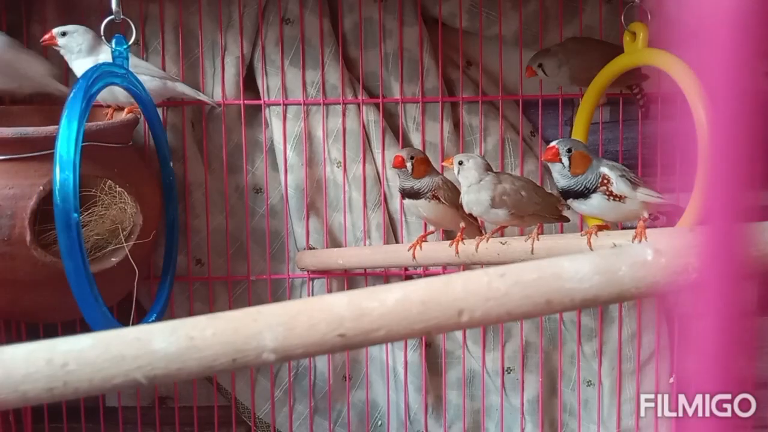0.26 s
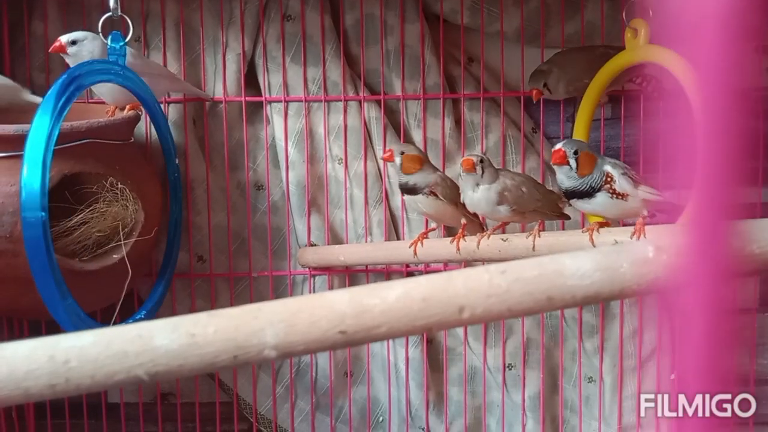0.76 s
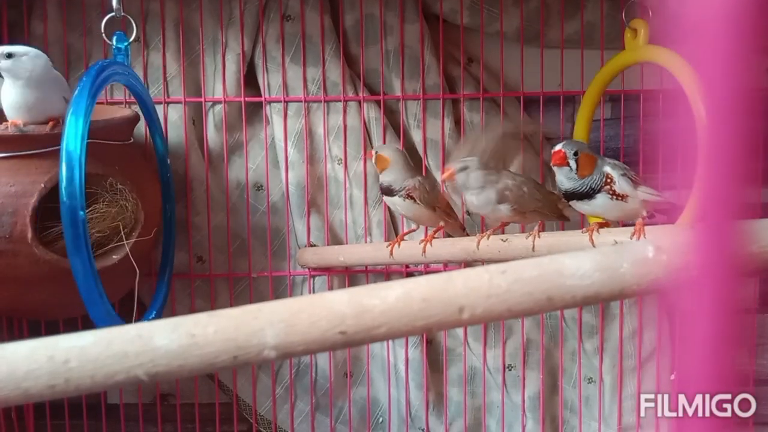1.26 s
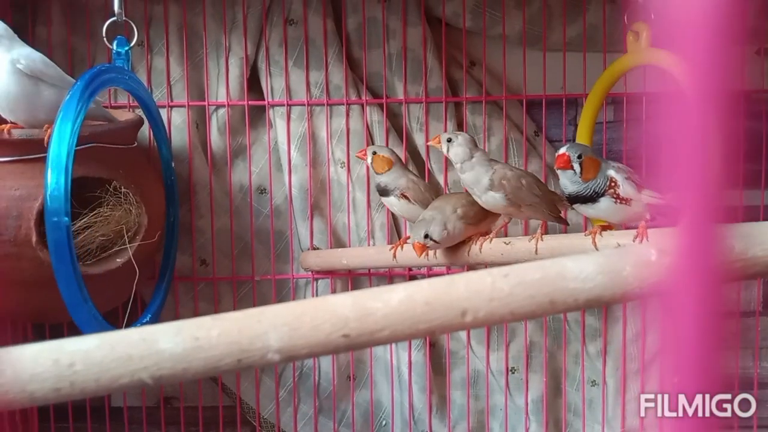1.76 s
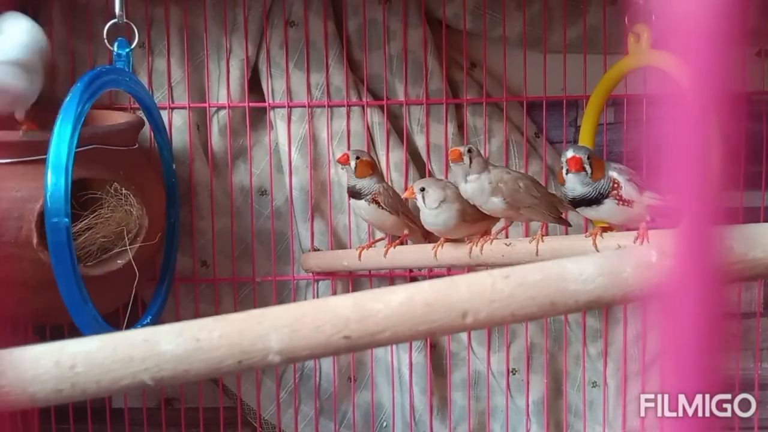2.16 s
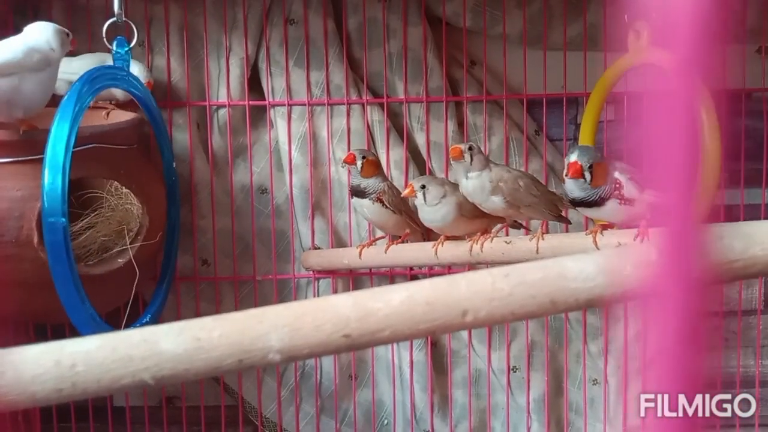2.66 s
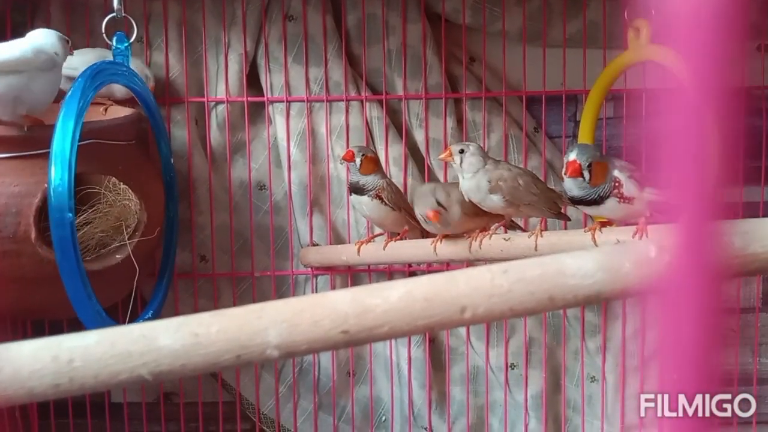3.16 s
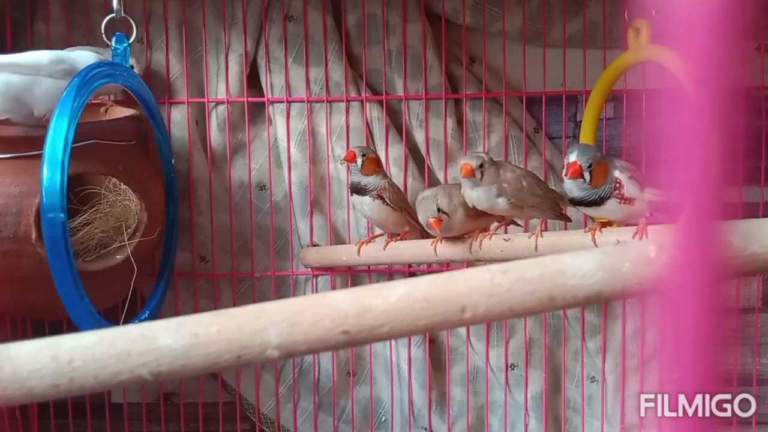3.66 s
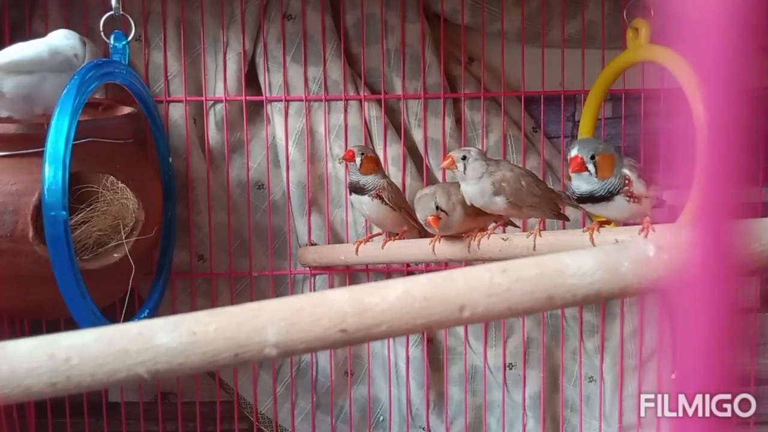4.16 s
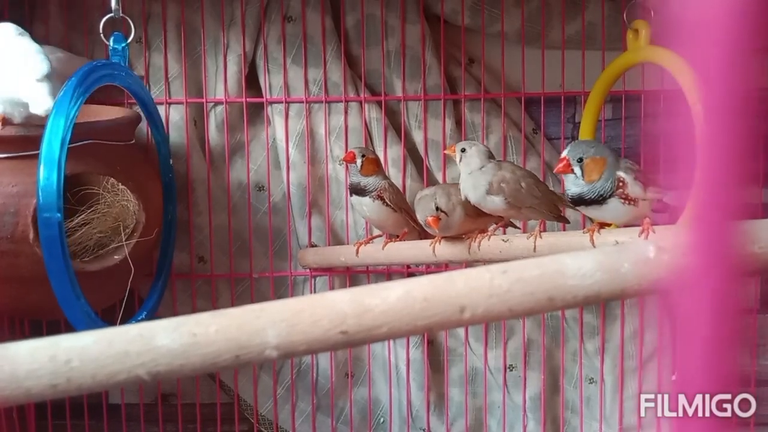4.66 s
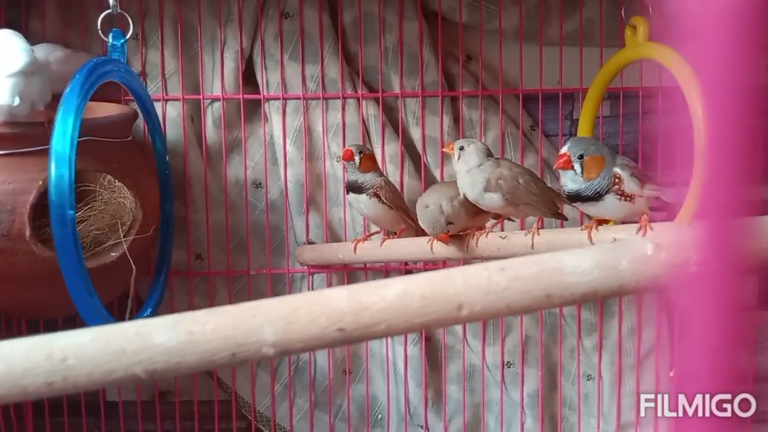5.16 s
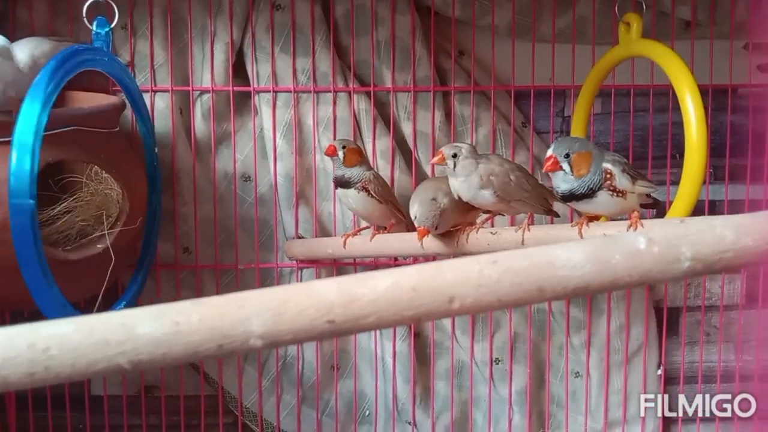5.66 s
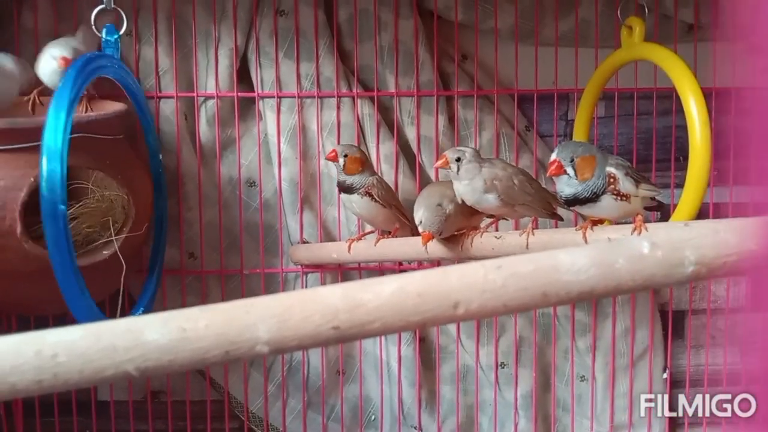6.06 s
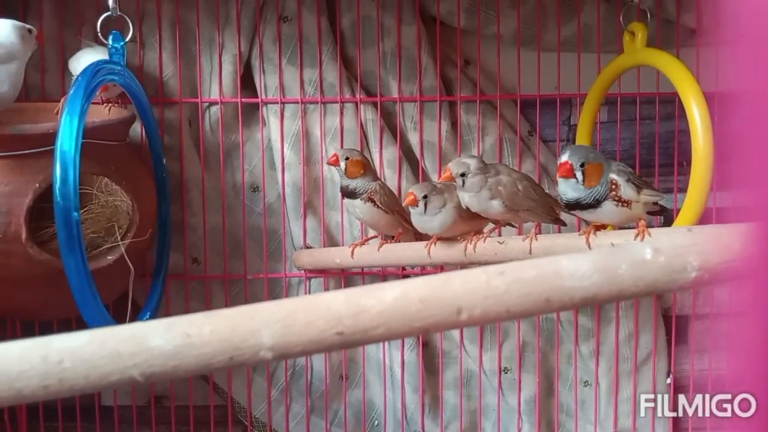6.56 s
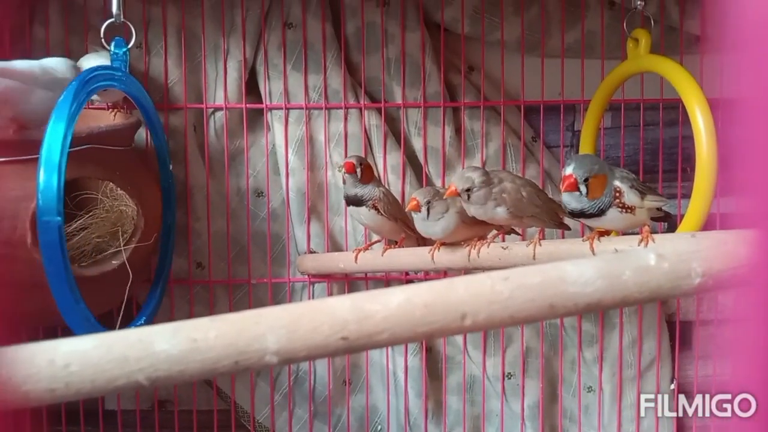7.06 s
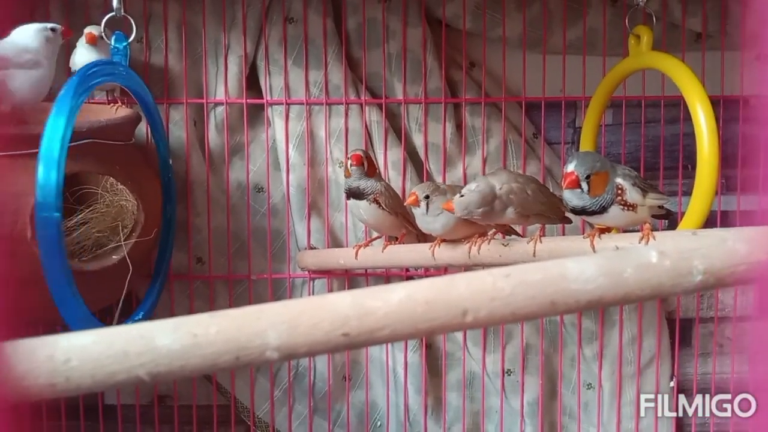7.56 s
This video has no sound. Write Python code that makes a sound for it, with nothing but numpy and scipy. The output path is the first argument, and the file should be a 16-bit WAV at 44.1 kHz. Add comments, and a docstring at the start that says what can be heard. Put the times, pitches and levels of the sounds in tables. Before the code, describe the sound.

Feathers flutter briefly as a finch's rapid, raspy song is already under way. It returns about nine times, some rounds cut off early, with little ticks and nasal peeps from neighbours between and over it. Dull wind thumps bump the phone microphone early and more strongly late. Behind lie very quiet air, a faint drone and thin whine; a distant blurred coo rises near the end on the small, hard-walled balcony.

```python
"""Zebra finches in a cage on a balcony, over still air (shaped noise), a low drone, a whine (a sine) and faint
hiss. From the start one male repeats a motif of sweeps, chips and buzzes, breaking off early or late, as
feathers rustle. A far bird whistles, the others call (at 6.1 s the male adds a lone cry) and puffs of air (low
noise) rumble on the microphone; near the end a pigeon coos. Each voice is a gliding harmonic stack of the
syrinx, coloured by throat and beak and answered by the close walls."""
import sys
import numpy as np
from scipy import signal
from scipy.fft import rfft, irfft, next_fast_len
from scipy.io import wavfile
from scipy.ndimage import map_coordinates

SR = 44100
rng = np.random.default_rng(int(sys.argv[2]) if len(sys.argv) > 2 else 0)


def file_out(sig):
    """Save sig as 16-bit WAV at sys.argv[1]."""
    # one column per channel
    cols = np.atleast_2d(sig).T
    # limit, then scale
    lim = np.clip(cols, -1, 1)
    pcm = np.round(lim * 32767).astype(np.int16)
    wavfile.write(sys.argv[1], SR, pcm)


N = 344950
TOP_HZ = 15650  # upper band limit

# Resonances of the pigeon's crop, lent to the far bird too: frequency_hz, gain_db
PIGEON_CROP = [(150, 7.5), (420, 1.5), (650, 0), (850, 3.5), (1170, 8), (1350, 2), (1700, -29), (3000, -50)]


def amp(db):
    """Level: decibels to an amplitude ratio."""
    return 10 ** (np.asarray(db) / 20)


def unit(x):
    """Normalisation: scale to an rms of 1."""
    return x / np.sqrt(np.mean(x ** 2) + 1e-20)


def colour(points, hz):
    """Frequency response: the gain of (hz, db) points joined on a logarithmic frequency axis."""
    f, db = np.transpose(points)
    return amp(np.interp(np.log(hz + 1), np.log(f + 1), db))


def wobble(rate, size):
    """Slow random modulation: a smooth curve through random knots, rate of them a second."""
    knots = rng.standard_normal(int(size * rate / SR) + 4)
    return map_coordinates(knots, [np.arange(size) * rate / SR])


def filtered(x, response):
    """Linear filtering: multiply the spectrum by a response given as a function of frequency."""
    m = next_fast_len(N + SR // 2)
    return irfft(rfft(x, m) * response(np.fft.rfftfreq(m, 1 / SR)), m)[:N]


def noise(spectrum):
    """Shaped noise: white noise coloured by a spectrum, at an rms of 1."""
    return unit(filtered(rng.standard_normal(N), lambda hz: colour(spectrum, hz)))


def add(track, s, sound):
    """Superposition: mix a sound into the track at s seconds, or at its beginning if s is negative."""
    part = track[max(round(s * SR), 0):][:len(sound)]
    part += sound[:len(part)]


def level_curve(rows):
    """Envelope: (s, db) points joined by straight lines over the whole scene."""
    return np.interp(np.arange(N) / SR, *np.transpose(rows))


def still_air():
    """Ambient noise: a broad random spectrum whose level wavers slowly."""
    # Spectrum of the still air: frequency_hz, gain_db
    air_spectrum = [(25, -21), (90, -5), (200, 5.5), (600, 0.5), (1000, -7), (1350, 6.5), (2000, -12.5),
                    (3000, -2.5), (4300, -13), (5500, -12), (7000, -2), (8300, 0), (10300, -4.5),
                    (11300, -43), (15500, -18)]
    return amp(-71 + 2.5 * wobble(3.6, N)) * noise(air_spectrum)


def low_drone():
    """Narrow low-frequency noise: a drone of uneven level."""
    # Spectrum of the drone: frequency_hz, gain_db
    drone_spectrum = [(25, -30.5), (45, -16), (65, 5.5), (85, 0.5), (130, -12.5), (300, -24), (900, -31),
                      (3000, -84.5)]
    # Course of its level: time_s, level_db
    drone_level = [(0, -61), (.7, -60.5), (2, -65.5), (3, -60), (3.7, -78.5), (4.6, -70.5), (5.1, -72.5),
                   (7.82, -71)]
    return amp(level_curve(drone_level) + 6.3 * wobble(12, N)) * noise(drone_spectrum)


def whine():
    """Pure tone: one sine whose frequency wavers slightly and whose level comes and goes."""
    # Course of the whine's level: time_s, level_db
    whine_level = [(0, -64), (1.1, -64.5), (1.5, -71), (6.7, -92), (7.2, -57.5), (7.82, -62)]
    hz = 5520 + 8 * wobble(60, N)
    phase = 2 * np.pi * np.cumsum(hz) / SR
    return amp(level_curve(whine_level) + 1.5 * wobble(9.4, N)) * np.sin(phase)


def hiss(rest_db=-81, waver_db=2):
    """Amplitude-modulated noise: a faint high hiss swells and fades in smooth arches."""
    # Spectrum of the hiss: frequency_hz, gain_db
    hiss_spectrum = [(5000, -9), (8500, -2.5), (11500, -5), (15500, -0.5)]
    # Swells of the hiss: top_s, length_s, level_db
    swells = [(.38, 0.78, -51.5), (0.837, 0.25, -52), (1.226, 0.11, -56), (1.5, 0.49, -56.5),
              (1.99, 0.37, -59), (2.748, .1, -56.5), (2.92, 0.12, -53.5), (3.443, 0.079, -63),
              (3.842, 0.16, -62.5), (4.697, 0.19, -56), (4.909, .1, -57), (5.097, 0.071, -72),
              (5.282, .13, -53.5), (6.19, 0.6, -59), (6.85, 0.11, -53.5), (7.015, 0.094, -54),
              (7.274, 0.18, -59), (7.638, 0.18, -59)]
    strength = np.full(N, amp(rest_db))
    for top, length, db in swells:
        add(strength, top - length / 2, amp(db) * np.hanning(int(length * SR)))
    return strength * amp(waver_db * wobble(6.1, N)) * noise(hiss_spectrum)


def turbulence(beak, size):
    """Turbulent flow: a short rush of air through the beak, rms 1."""
    spectrum = rfft(rng.standard_normal(size))
    return unit(irfft(spectrum * colour(beak, np.fft.rfftfreq(size, 1 / SR)), size))


def syrinx(gesture, beak, flutter=0, flutter_hz=0, tilt_db=0, jitter=0.018, shimmer=0.64, jitter_hz=1400,
           uneven_db=4.0, uneven_hz=70, rasp=0.43):
    """Source and filter: a gliding harmonic stack slides through the resonances of the beak.

    Columns of gesture: time_s, pitch_hz, level_db, count of strong harmonics, roughness (0-1)."""
    s, pitch, db, harmonics, rough = np.transpose(gesture)
    t = np.arange(int(s[-1] * SR)) / SR
    follow = lambda column: np.interp(t, s, column)
    rough = follow(rough)
    vibrato = flutter * np.sin(2 * np.pi * flutter_hz * t)
    hz = follow(pitch) * (1 + jitter * rough * wobble(jitter_hz, len(t)) + vibrato)
    k = np.arange(1, min(24, int(TOP_HZ / pitch.min())) + 1)[:, None]

    gains = colour(beak, k * hz) * amp(tilt_db * np.log2(k))  # tilt in dB per octave
    # harmonics beyond the strong ones fall away steeply; few of them leave a nearly pure tone
    gains /= 1 + (k / np.maximum(follow(harmonics), .5)) ** 9
    gains *= k * hz < SR / 2
    # the moving beak favours now one harmonic, now another
    gains *= amp(uneven_db * np.array([wobble(uneven_hz, len(t)) for _ in k]))
    gains /= np.sqrt(np.sum(gains ** 2, axis=0) / 2 + 1e-20)

    # the throat delays each harmonic differently, which blunts the pulses
    phase = 2 * np.pi * (k * np.cumsum(hz) / SR + rng.random(k.shape))
    voice = np.sum(gains * np.sin(phase), axis=0) + rasp * rough * turbulence(beak, len(t))
    fade = np.clip(np.minimum(t - s[0], s[-1] - t) / .002, 0, 1)  # 2 ms at either end
    return voice * amp(follow(db)) * (1 + shimmer * rough * wobble(jitter_hz, len(t))) * fade


def balcony(sound, near_db=-13, near_t60=0.26, far_db=-22, far_t60=0.18, wall_db=-6, wall_delay=0.019):
    """Room response: direct sound, four wall echoes and two diffuse tails, drawn anew for every sound."""
    t = np.arange(SR // 3) / SR

    def tail(t60):
        """Reverberant decay: noise that falls by 60 dB in t60 seconds."""
        return unit(rng.standard_normal(len(t)) * amp(-60 * t / t60) * (t > .002)) / np.sqrt(len(t))

    response = (t == 0) + amp(near_db) * tail(near_t60) + amp(far_db) * tail(far_t60)
    walls = (rng.uniform(0.11, 1, size=4) * wall_delay * SR).astype(int)
    response[walls] += amp(wall_db) / 2  # the four echoes share the power of wall_db
    return signal.fftconvolve(sound, response / np.linalg.norm(response))


def note(start, length, hz, end_hz, db, harmonics, rough, held=0, bend=1, scoop=0, droop_db=0,
         attack=0.0052, release=0.0013, size=96):
    """Frequency glide: the pitch scoops up, holds for a share of the length, then glides (early if bend < 1)."""
    gate_db = 16  # the note starts and ends this far below its body
    t = np.linspace(0, length, size)
    opening = np.clip(t / attack, 0, 1)
    closing = np.clip((length - t) / release, 0, 1)
    glide = np.clip((t / length - held) / (1 - held), 0, 1) ** bend
    pitch = hz * (end_hz / hz) ** glide * (1 - scoop * (1 - opening))
    level = db + droop_db * t / length - gate_db * ((1 - opening) ** 2 + (1 - closing) ** 2)
    return np.transpose([start + t, pitch, level, np.full(size, harmonics), np.full(size, rough)])


def syllable(name, stray=0.00657):
    """Frequency modulation of a voice: a few notes share one small stray in pitch; only the buzz flutters."""
    # Notes of each syllable, as arguments of note(): start, length, attack, release [s]; hz, end_hz [Hz];
    # db, droop_db [dB]; harmonics [count of strong ones]; rough, held, scoop [0-1]; bend [exponent]
    squeak_notes = [dict(start=0, length=0.011, hz=5320, end_hz=5650, db=-5.5, harmonics=1.2, rough=0.24),
                    dict(start=0.0079, length=0.01153, hz=4300, end_hz=2680, bend=0.57, db=4, droop_db=-9.5, attack=0.0025, release=0.0035, harmonics=0.9, rough=0.23)]
    hook_notes = [dict(start=0, length=0.036, hz=2886, end_hz=1790, bend=1.2, db=-1.5, droop_db=-3.5, harmonics=1.95, rough=0.18),
                  dict(start=.032, length=0.073, hz=868, end_hz=485, bend=1.4, db=2.5, droop_db=2, attack=0.024, release=0.041, harmonics=10.1, rough=0.18)]
    cry_notes = [dict(start=0, length=0.094, hz=891, end_hz=520, held=.36, bend=0.88, scoop=.25, db=-1, droop_db=-1.5, attack=0.0097, release=0.027, harmonics=20.2, rough=0.16)]
    chip_notes = [dict(start=0.0014, length=0.0262, hz=1945, end_hz=1458, db=-20, harmonics=1.5, rough=0.94),
                  dict(start=.022, length=0.0144, hz=5310, end_hz=7420, db=-11, droop_db=10, harmonics=1.2, rough=0.54)]
    stutter_notes = [dict(start=0.00074, length=0.0066, hz=896, end_hz=675, db=-18, attack=0.00092, release=.003, harmonics=11, rough=.95),
                     dict(start=.019, length=0.0087, hz=897, end_hz=705, db=-9.5, attack=0.00081, release=0.0045, harmonics=11, rough=0.71),
                     dict(start=0.036, length=0.004, hz=925, end_hz=673, db=-6.5, attack=0.0008, release=0.0022, harmonics=9.7, rough=0.66),
                     dict(start=.036, length=0.019, hz=2033, end_hz=1665, bend=0.62, db=0.5, droop_db=-5.5, release=0.0077, harmonics=3.5, rough=0.39)]
    buzz_notes = [dict(start=0.0024, length=0.051, hz=3040, end_hz=2878, db=-4.5, attack=0.027, release=0.021, harmonics=1, rough=0.16)]
    tut_notes = [dict(start=.002, length=.031, hz=734, end_hz=575, db=-5.5, attack=0.012, release=0.016, harmonics=12.9, rough=0.65)]
    slur_notes = [dict(start=0, length=0.019, hz=1441, end_hz=1372, db=-12, harmonics=4.06, rough=0.14),
                  dict(start=.015, length=.028, hz=1403, end_hz=945.6, db=0, droop_db=-4, attack=0.0044, release=0.002, harmonics=7.6, rough=0.36),
                  dict(start=.038, length=.086, hz=995, end_hz=539, bend=.9, db=-5, droop_db=-12, attack=0.0046, release=0.029, harmonics=14.8, rough=0.4)]
    # Resonances of throat and beak: frequency_hz, gain_db
    hook_beak = [(600, -40.5), (1100, -24.5), (1600, -8), (2400, -13.5), (3200, -3), (4000, -2.5),
                 (5100, -1.5), (6700, -2), (7500, -1.5), (8400, -19), (10000, -8), (15000, -16)]
    cry_beak = [(600, -45), (1100, -28), (1700, -10), (2200, -22.5), (2800, -9.5), (3500, -1), (4300, -6.5),
                (5300, -1), (6200, -12), (7000, -24), (9500, -39.5), (15000, -34)]
    chip_beak = [(1000, -22.5), (1800, -3.5), (2500, -5), (3700, 10.5), (5200, -6.5), (7000, -4.5),
                 (9000, -12.5), (15000, -45)]
    tut_beak = [(600, -50), (1500, -25), (2500, -11), (3400, 1.5), (4500, -8), (5500, -11.5), (7200, -0.5),
                (9000, -12), (15000, -20)]
    slur_beak = [(600, -10.5), (1000, -31.5), (1450, 6), (2000, -3), (2900, 4), (3900, 7), (4700, 0.5),
                 (5600, 4), (6900, -0.5), (8000, -11.5), (9500, -22.5), (15000, -19.5)]
    notes, beak = {
        "squeak": (squeak_notes, hook_beak), "hook": (hook_notes, hook_beak),
        "cry": (cry_notes, cry_beak), "chip": (chip_notes, chip_beak),
        "stutter": (stutter_notes, chip_beak), "buzz": (buzz_notes, chip_beak),
        "tut": (tut_notes, tut_beak), "slur": (slur_notes, slur_beak)}[name]
    flutter = .12 * (name == "buzz")  # share of the pitch
    tuning = [1, 1 + stray * rng.standard_normal(), 1, 1, 1]  # scales the pitch column alone
    sound = np.zeros(SR // 6)
    for shape in notes:
        add(sound, 0, syrinx(note(**shape) * tuning, beak, flutter=flutter, flutter_hz=214.4))
    return balcony(sound)


def song():
    """Temporal pattern: the male runs through his motif until he breaks off, with single syllables besides."""
    # The motif, always in this order: delay_s, level_db, syllable name
    motif = [(0, 0, "stutter"), (.066, -2.5, "buzz"), (.154, -0.5, "slur"), (.308, -9.5, "squeak"),
             (.327, -5.5, "hook"), (.468, 4, "cry"), (.629, -4.5, "chip")]
    # Names of the syllables that take the level of the opening
    opening_names = ("stutter", "buzz")
    # Each time he sings it: start_s, opening_db, rest_db, name of the last syllable
    songs = [(-.287, -33, -30.5, "chip"), (.432, -29, -28, "hook"), (1.624, -28.5, -27, "hook"),
             (2.53, -33, -28.5, "chip"), (3.251, -32.5, -30, "squeak"), (4.187, -35.5, -29, "chip"),
             (4.906, -35.5, -29, "chip"), (5.627, -40, -32, "hook"), (6.609, -29, -27.5, "hook")]
    # Single syllables besides: start_s, level_db, syllable name
    asides = [(.868, -41, "tut"), (1.216, -42, "tut"), (1.358, -33, "chip"), (1.447, -27, "stutter"),
              (1.553, -30.5, "tut"), (2.356, -38.5, "stutter"), (2.459, -40.5, "tut"),
              (4.011, -40.5, "stutter"), (4.113, -41, "tut"), (6.428, -31.5, "stutter"),
              (6.53, -38.5, "tut")]
    track = np.zeros(N)
    for start, opening_db, rest_db, last in songs:
        for delay, db, name in motif:
            if start + delay >= 0:  # the first song is already under way
                song_db = opening_db if name in opening_names else rest_db
                add(track, start + delay, amp(db + song_db) * syllable(name))
            if name == last:
                break
    for start, db, name in asides:
        add(track, start, amp(db) * syllable(name))
    return track


def rustle(depth_db=10, flutter_db=4.5, grain_db=2.0):
    """Friction noise: each shake of the feathers swells and dies away, fluttering and grainy."""
    # Spectrum of the feathers: frequency_hz, gain_db
    feather_spectrum = [(500, -16), (1400, -1), (3000, 5.5), (6000, 10), (8000, 1.5), (11000, -14),
                        (15500, -8.5)]
    # Bursts of rustling: start_s, length_s, level_db
    bursts = [(0.054, 0.56, -40), (.6, 0.42, -61.5), (1.43, 0.25, -55), (6.536, 0.22, -52)]
    strength = np.zeros(N)
    for start, length, db in bursts:
        arch = np.sin(np.linspace(0, np.pi, int(length * SR)))
        add(strength, start, amp(db + depth_db * (arch - 1.0)) * arch)
    grain = amp(flutter_db * wobble(46, N) + grain_db * wobble(700, N))
    return strength * grain * noise(feather_spectrum)


def far_bird():
    """Nearly sinusoidal tone: thin whistles glide up, their level arched, blurred by the buildings."""
    # Whistles: start_s, length_s, pitch_hz (at mid-length), level_db
    whistles = [(0.27, 0.044, 1317, -36.5), (1.157, 0.073, 1307, -54), (3.67, 0.042, 1345, -72),
                (7.172, 0.079, 1280, -48.5)]
    track = np.zeros(N)
    for start, length, hz, db in whistles:
        gesture = [(0, .93 * hz, -12, 1, .2), (length / 2, hz, 0, 1, .2), (length, 1.1 * hz, -12, 1, .2)]
        add(track, start, amp(db) * balcony(syrinx(gesture, PIGEON_CROP), far_db=1))
    return track


def flock(rise=0.01543, fall=0.014, clean=0.16, rough=0.46, harmonics=15):
    """Harmonic call: a contact call scoops up to a held clean pitch, then sags and roughens."""
    # Contact calls, and at 6.098 s the male's lone cry: start_s, length_s, pitch_hz, held_share (0-1), end_hz,
    # # level_db, swell_db, bright_db (per octave)
    calls = [(0.859, 0.045, 645, 0.61, 493, -39.5, 3, 1.5), (0.937, 0.075, 822, 0.29, 536, -32, 1.5, 4),
             (1.571, 0.1, 669, 0.18, 530, -44.5, 3, 6.5), (2.016, 0.07, 785, 0.19, 515, -33.5, -1, 2),
             (2.143, 0.072, 579.6, 0.47, 567.5, -42, 5.5, 4.5), (2.201, 0.09, 659, 0, 650, -51, -14, 9),
             (2.307, 0.098, 794, 0.19, 509.6, -38, 4, 5), (2.611, 0.075, 692, 0.55, 636, -45.5, 6, 4),
             (2.826, 0.086, 480, 0.45, 450, -35, 5, 4), (3.218, 0.1, 668.4, 0.7, 622, -49.5, 7, 1.5),
             (3.676, 0.047, 544, 1, 541, -60.5, 3, 14), (5.458, 0.093, 780, 0.2, 513, -39.5, -2, 0),
             (6.098, 0.11, 895, 0.26, 503, -33.5, -6.5, 6.5), (6.262, 0.06, 695, 0, 561, -42, 2, 9.5),
             (6.344, 0.085, 485, 0.5, 463, -35.5, 5, 5.5), (7.039, 0.098, 863.4, 0.55, 582, -31, 6, 4.5),
             (7.226, 0.075, 575, 0.49, 550, -40.5, 2.5, 4), (7.396, 0.097, 825, 0.16, 502.5, -35, -3, 1),
             (7.786, 0.068, 580, .6, 550, -55, 19, 0)]
    # Resonances of throat and beak: frequency_hz, gain_db
    flock_beak = [(500, -22), (1100, -8.5), (1700, -2.5), (2200, -7), (2800, -1), (3400, 6.5), (4000, -7.5),
                  (4700, 2), (5400, -9), (6500, -21.5), (9000, -32.5), (15000, -58)]
    track = np.zeros(N)
    for start, length, hz, held, end_hz, db, swell_db, bright_db in calls:
        times = np.sort([0, rise, held * length, length - fall, length])
        pitch = np.interp(times, [0, rise, held * length, length], [0.84 * hz, .985 * hz, hz, end_hz])
        level = np.interp(times, [0, rise, length - fall, length], [-19, -swell_db / 2, swell_db / 2, -17])
        roughness = clean + rough * (1 - held) * (times > held * length)
        gesture = np.transpose([times, pitch, level, np.full_like(times, harmonics), roughness])
        call = syrinx(gesture, flock_beak, tilt_db=bright_db, uneven_hz=42.6)
        add(track, start, amp(db) * balcony(call))
    return track


def puffs(rise_s=0.014):
    """Wind noise: moving air buffets the microphone port; each puff rises fast and ebbs away."""
    # Spectrum of the rumble: frequency_hz, gain_db
    rumble_spectrum = [(15, -64), (25, -35), (71, 2), (130, 4.5), (167, -3), (237, -14.5), (362, -34.5),
                       (460, -33), (600, -66), (780, -73), (1320, -120)]
    # Puffs of air: peak_s, level_db, ebb_s (time constant)
    gusts = [(1.04, -53.5, .02), (1.11, -63, 0.011), (1.325, -44, 0.036), (1.471, -37, 0.072),
             (1.555, -32, 0.038), (1.669, -27.5, 0.037), (1.865, -46, 0.028), (2.88, -44, 0.014),
             (5.57, -46.5, 0.015), (5.735, -36, 0.029), (5.99, -51.5, 0.046), (6.14, -52, 0.041),
             (6.254, -27, 0.046), (6.33, -40, 0.18), (6.593, -29, 0.047), (6.68, -37, 0.2),
             (6.86, -35, 0.046), (6.953, -41, 0.022), (7.1, -45.5, 0.076)]
    t = np.arange(N) / SR
    power = np.zeros(N)
    for peak, db, ebb in gusts:
        envelope = np.exp(-np.maximum((peak - t) / rise_s, (t - peak) / ebb))
        power += (amp(db) * envelope) ** 2
    return np.sqrt(power) * noise(rumble_spectrum)


def pigeon():
    """Low resonant voice: a coo of few harmonics rises, then sinks a little, blurred by the buildings."""
    # The coo's gesture: time_s, pitch_hz, level_db, count of strong harmonics, roughness (0-1)
    coo_gesture = [(7.05, 148.4, -63, 1.3, 0.7), (7.119, 222.7, -49, 1.3, .5), (7.279, 335.5, -51, 2, 0.76),
                   (7.391, 386.7, -45, 3, 0.37), (7.46, 436, -35.5, 3, 0.31), (7.57, 384.7, -52.5, 3, 0.31),
                   (7.668, 378, -83, 3, 0.2)]
    track = np.zeros(N)
    start = coo_gesture[0][0]
    gesture = np.array(coo_gesture) - [start, 0, 0, 0, 0]
    coo = syrinx(gesture, PIGEON_CROP, jitter=0.0457, shimmer=0.87, jitter_hz=90.8, uneven_db=2, uneven_hz=19.6)
    add(track, start, balcony(coo, near_db=-6, far_db=0.5, far_t60=0.3))
    return track


def scene():
    """Superposition at one microphone: all pressures add, heard alike in both ears."""
    background = still_air() + low_drone() + whine() + hiss()
    birds = song() + far_bird() + flock() + pigeon()
    mono = background + birds + rustle() + puffs()
    return np.array([mono, mono])


def record(dry):
    """Band limitation: the phone keeps nothing above its upper limit."""
    return np.array([filtered(channel, lambda hz: hz < TOP_HZ) for channel in dry])


dry = scene()
out = record(dry)
file_out(out)
```